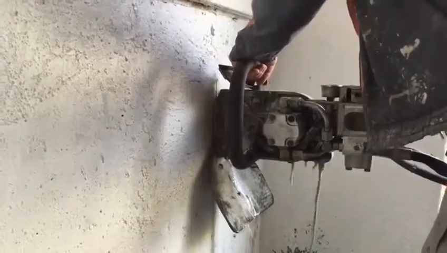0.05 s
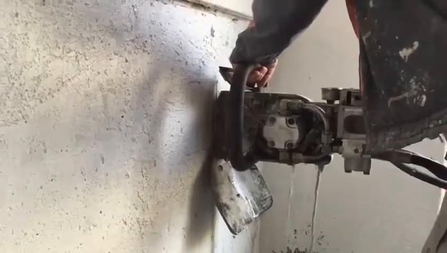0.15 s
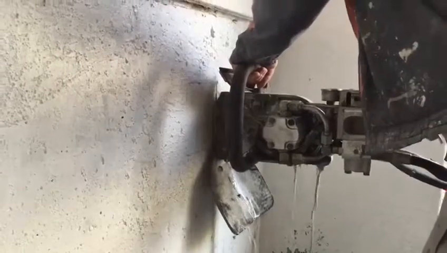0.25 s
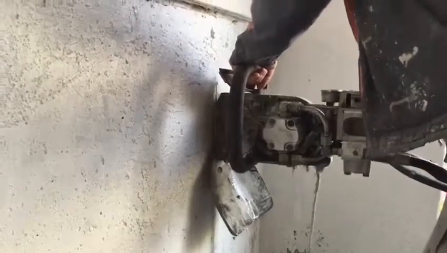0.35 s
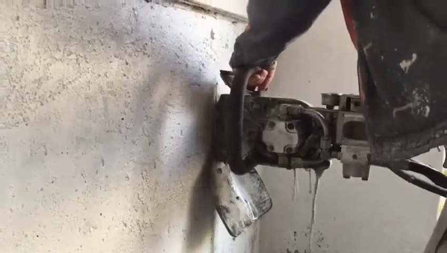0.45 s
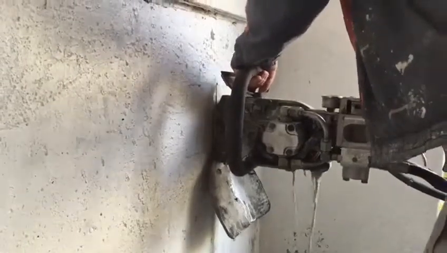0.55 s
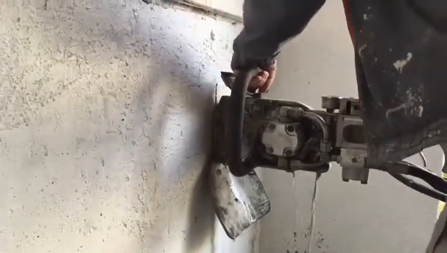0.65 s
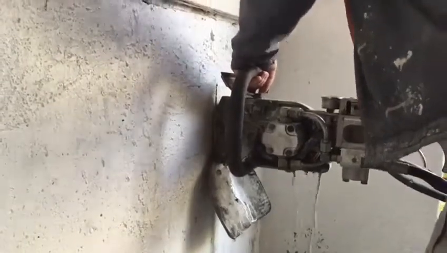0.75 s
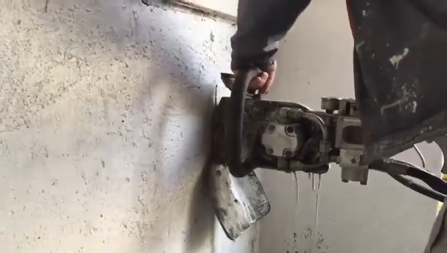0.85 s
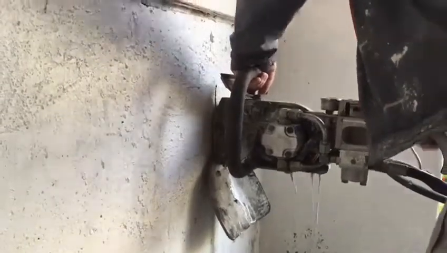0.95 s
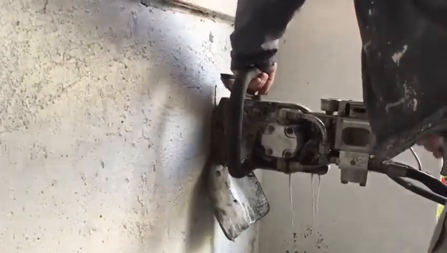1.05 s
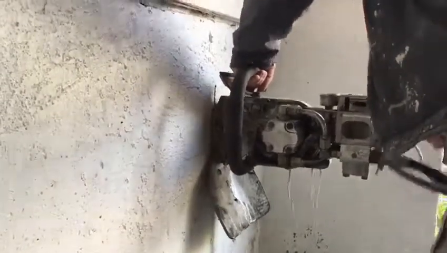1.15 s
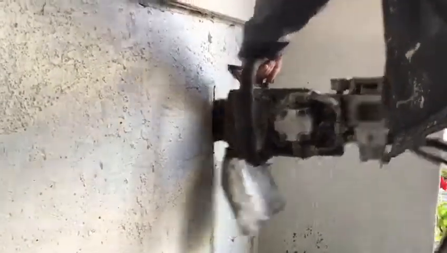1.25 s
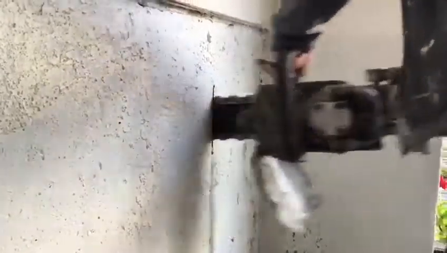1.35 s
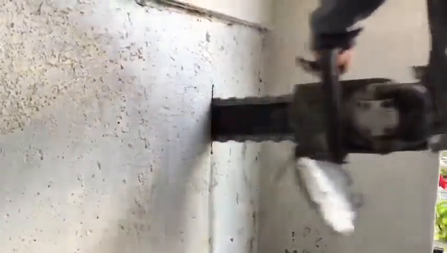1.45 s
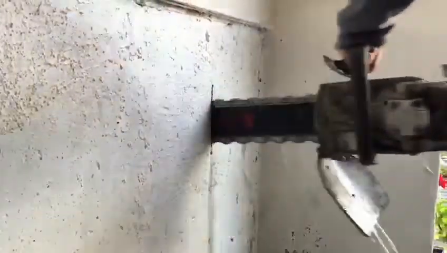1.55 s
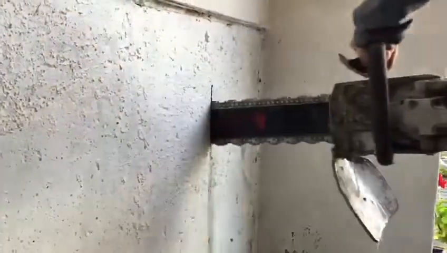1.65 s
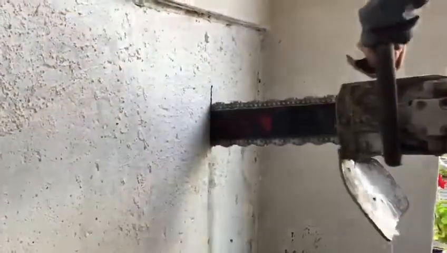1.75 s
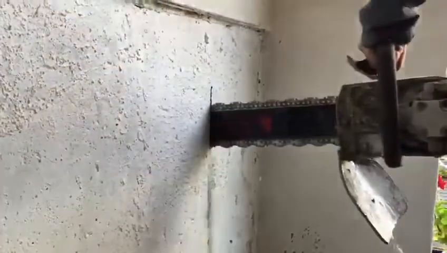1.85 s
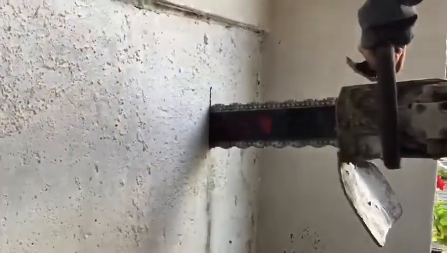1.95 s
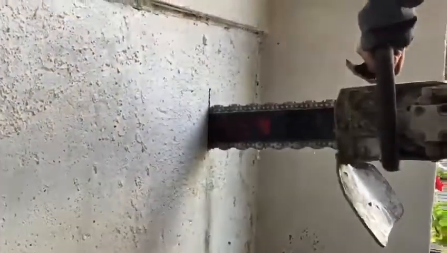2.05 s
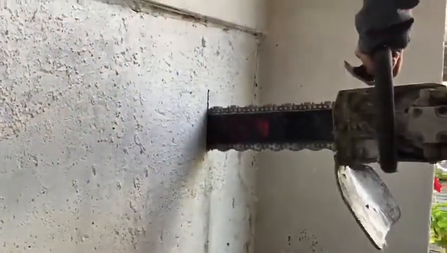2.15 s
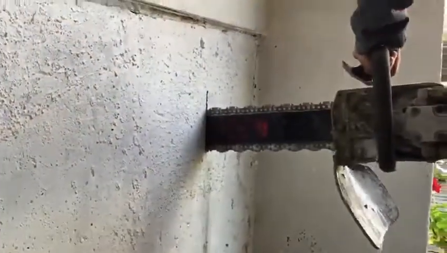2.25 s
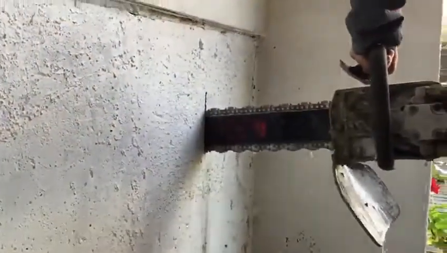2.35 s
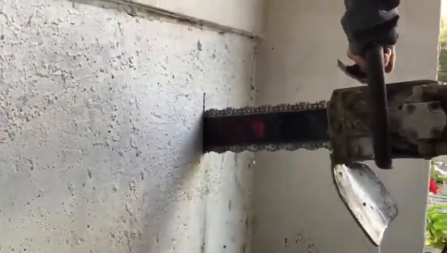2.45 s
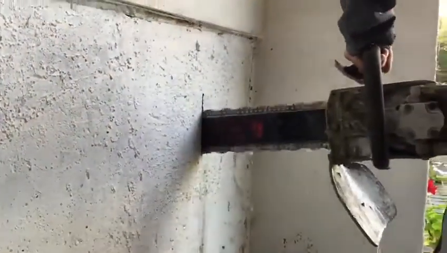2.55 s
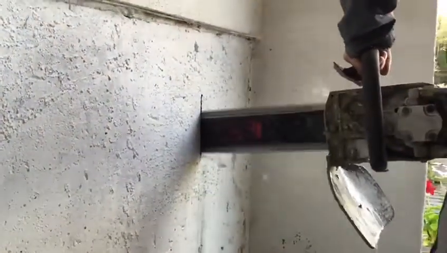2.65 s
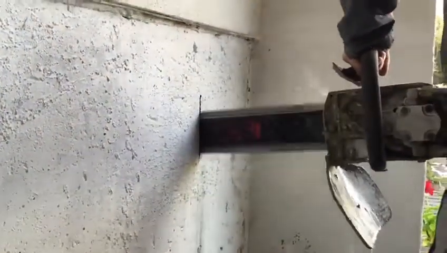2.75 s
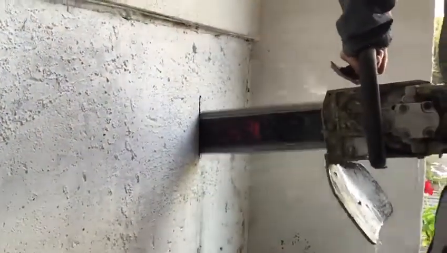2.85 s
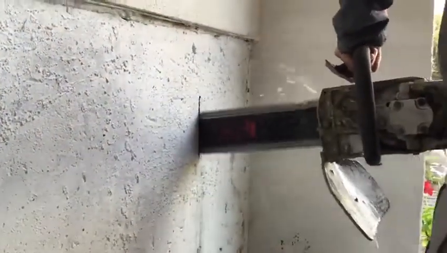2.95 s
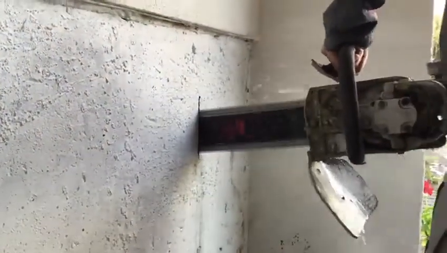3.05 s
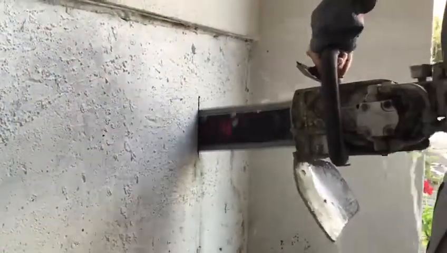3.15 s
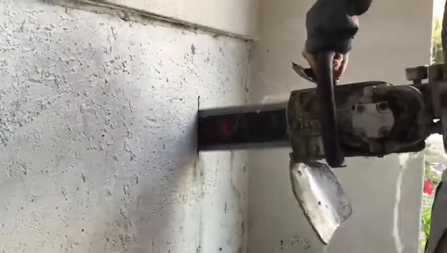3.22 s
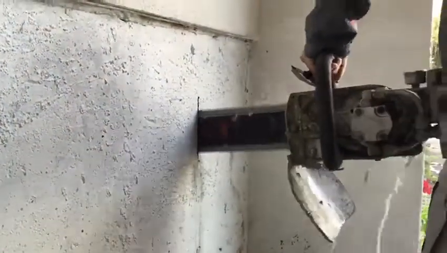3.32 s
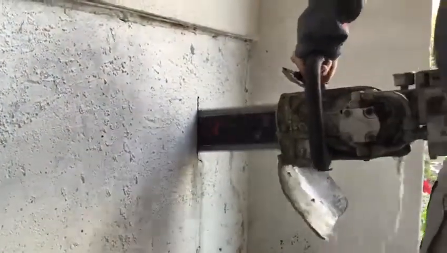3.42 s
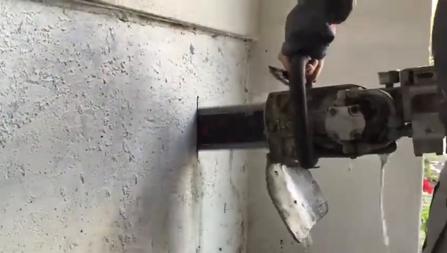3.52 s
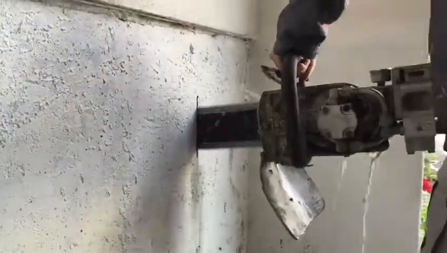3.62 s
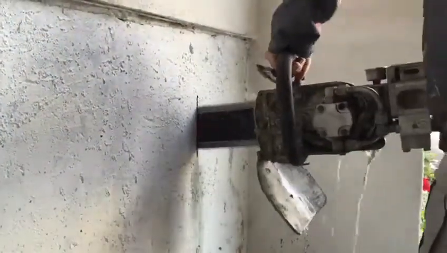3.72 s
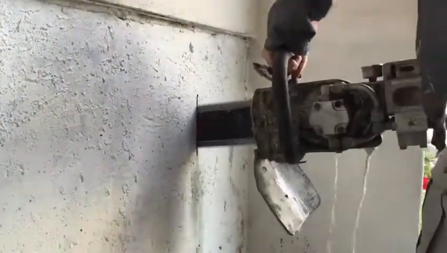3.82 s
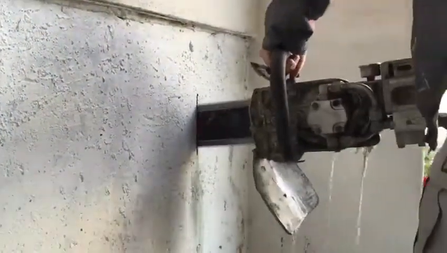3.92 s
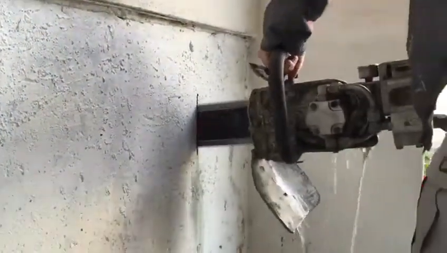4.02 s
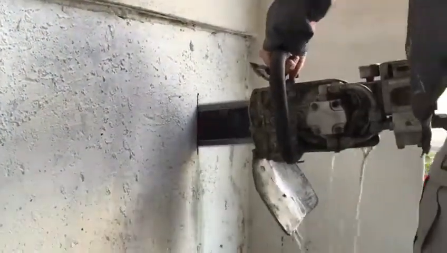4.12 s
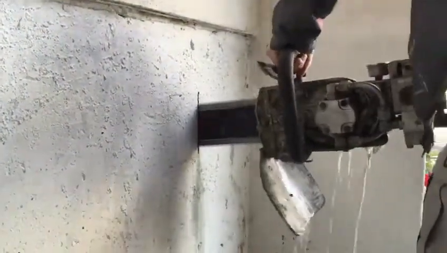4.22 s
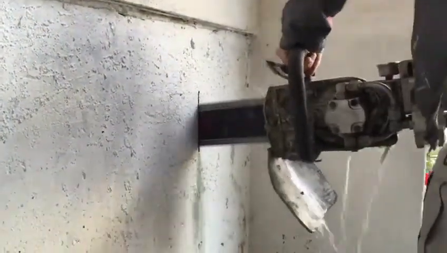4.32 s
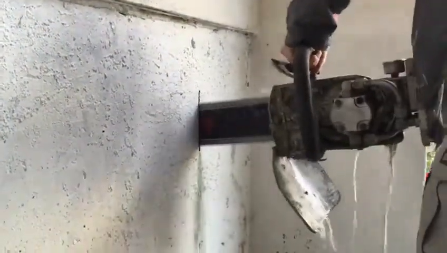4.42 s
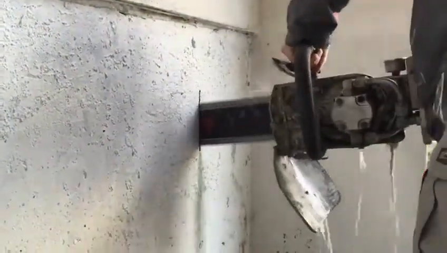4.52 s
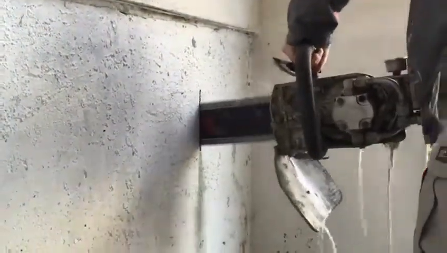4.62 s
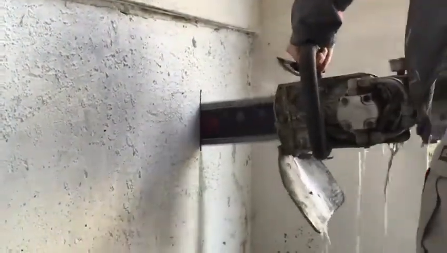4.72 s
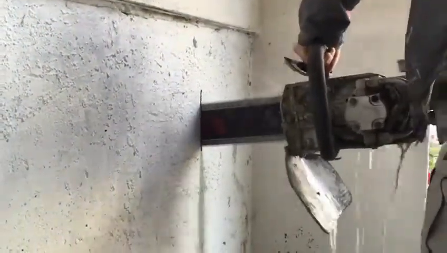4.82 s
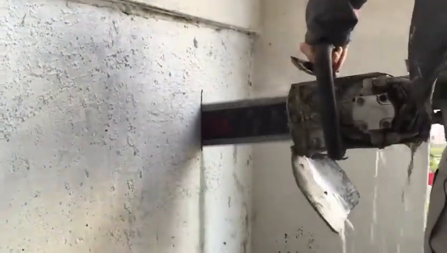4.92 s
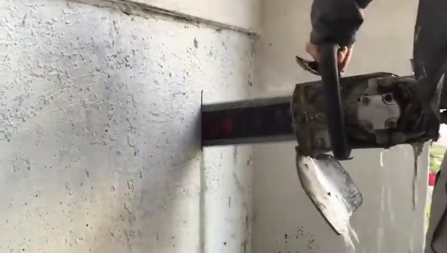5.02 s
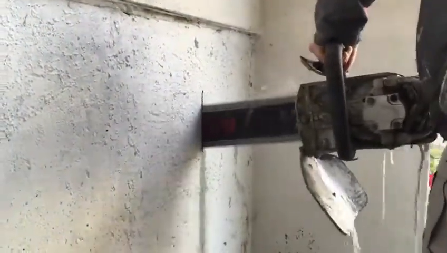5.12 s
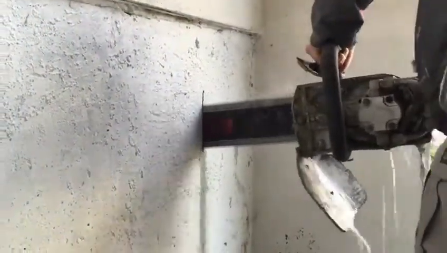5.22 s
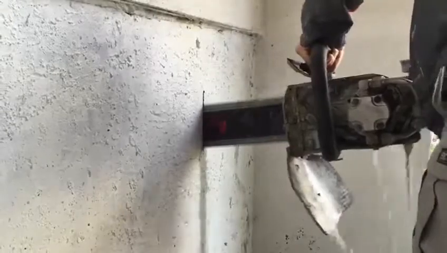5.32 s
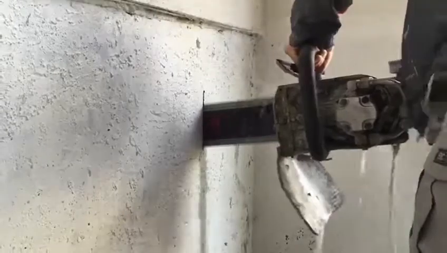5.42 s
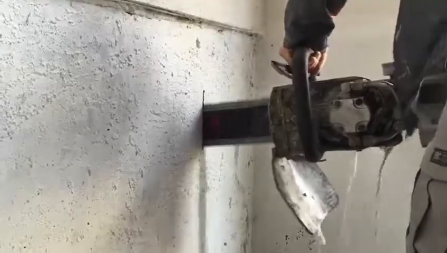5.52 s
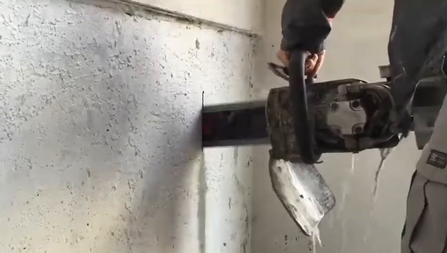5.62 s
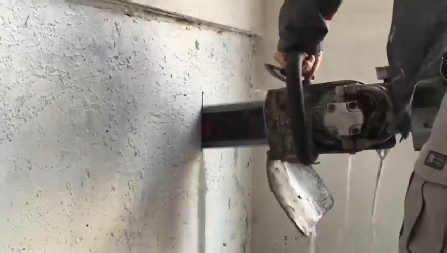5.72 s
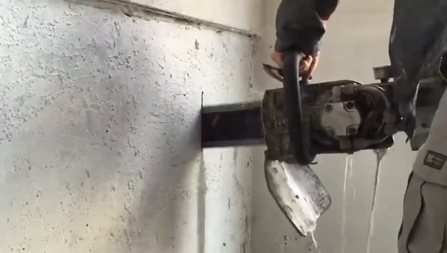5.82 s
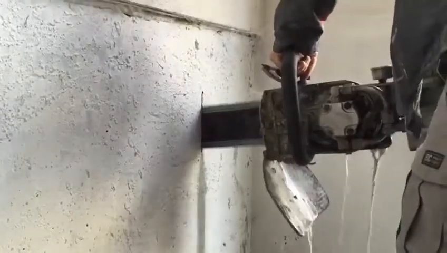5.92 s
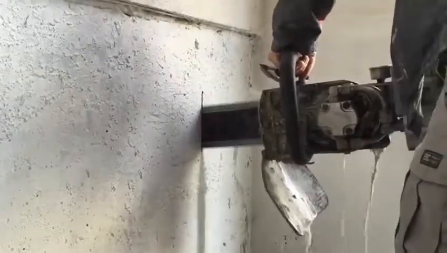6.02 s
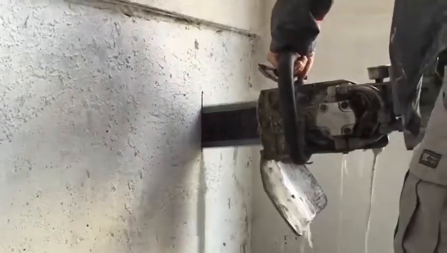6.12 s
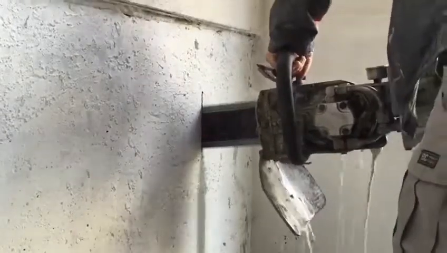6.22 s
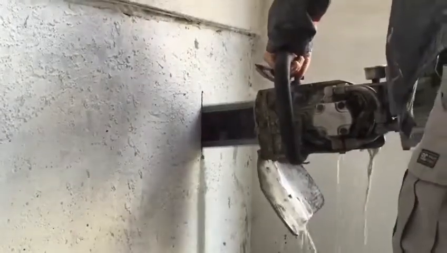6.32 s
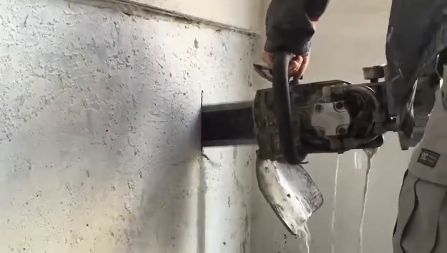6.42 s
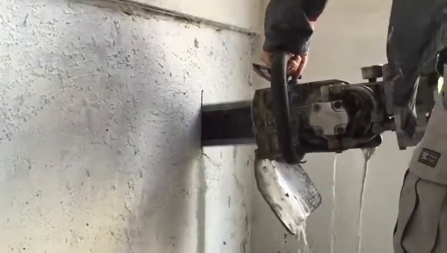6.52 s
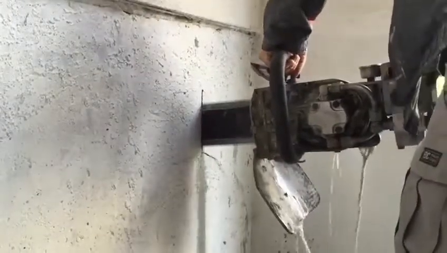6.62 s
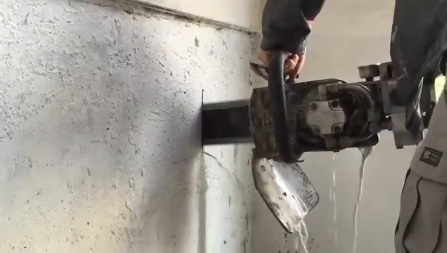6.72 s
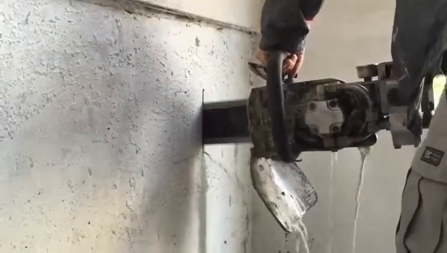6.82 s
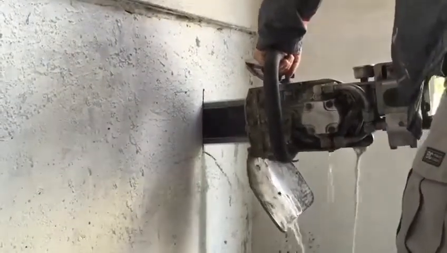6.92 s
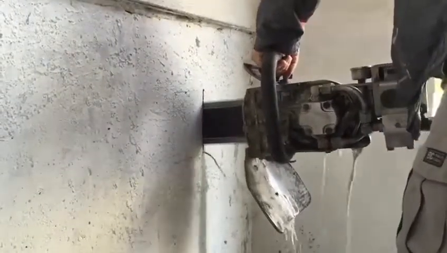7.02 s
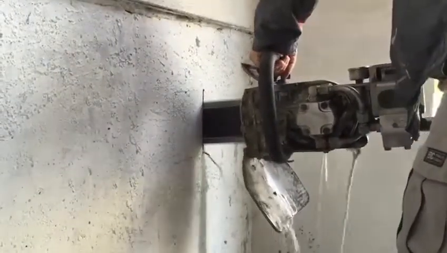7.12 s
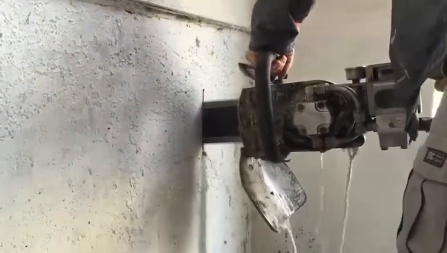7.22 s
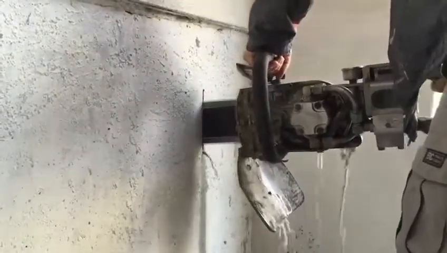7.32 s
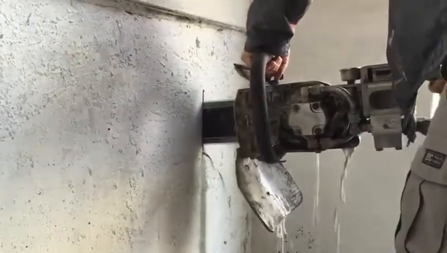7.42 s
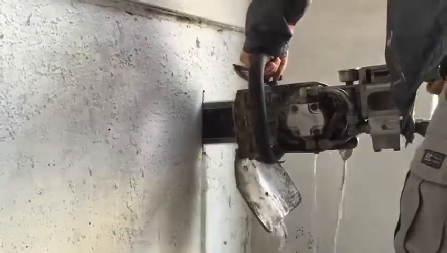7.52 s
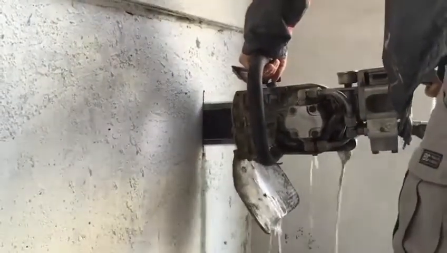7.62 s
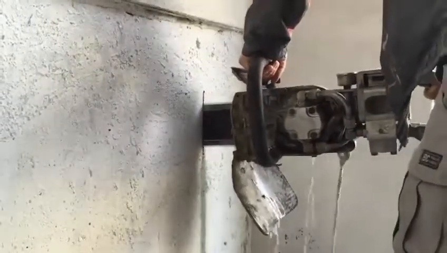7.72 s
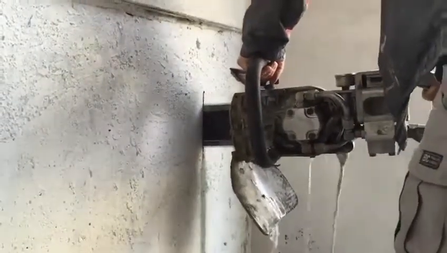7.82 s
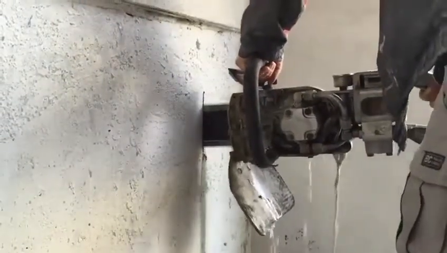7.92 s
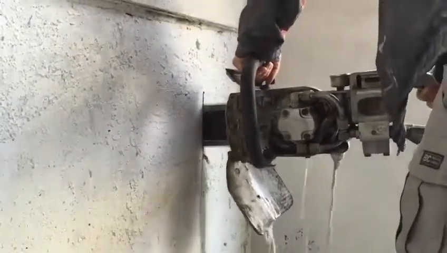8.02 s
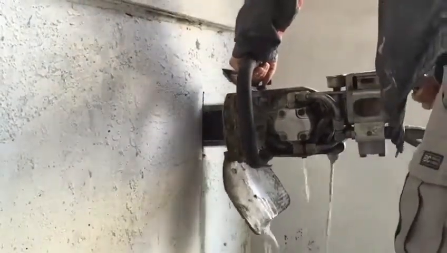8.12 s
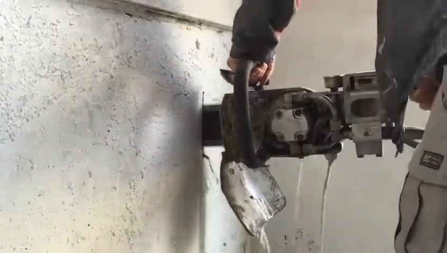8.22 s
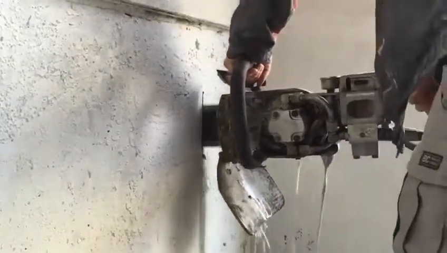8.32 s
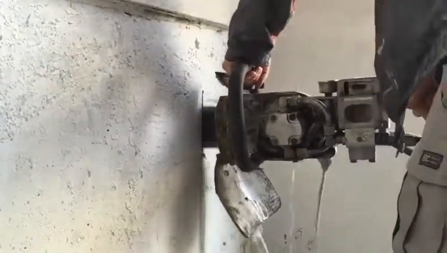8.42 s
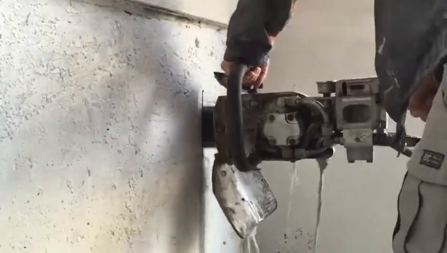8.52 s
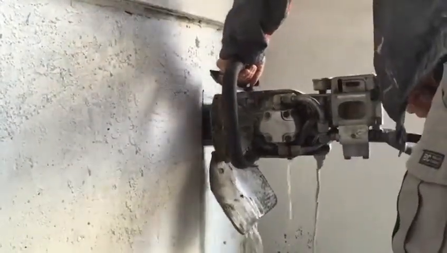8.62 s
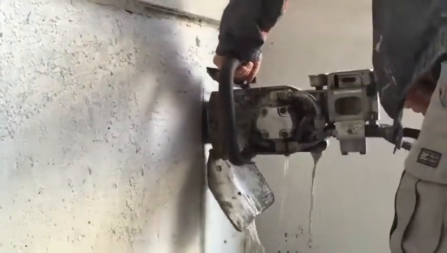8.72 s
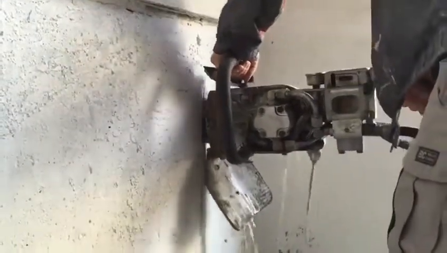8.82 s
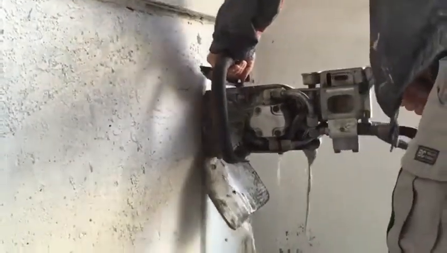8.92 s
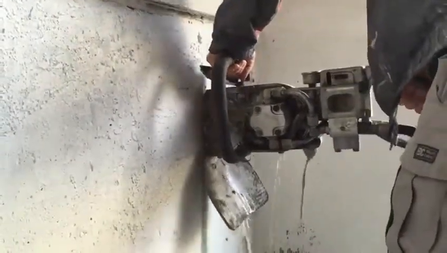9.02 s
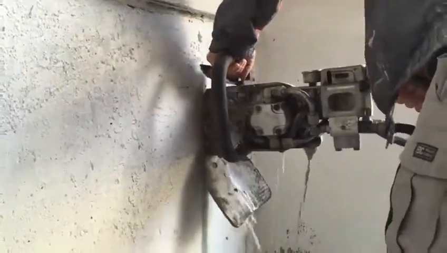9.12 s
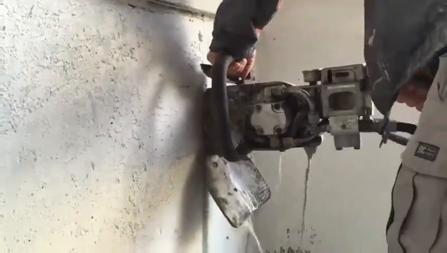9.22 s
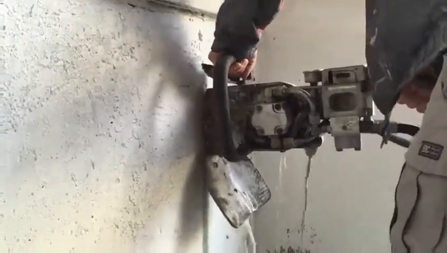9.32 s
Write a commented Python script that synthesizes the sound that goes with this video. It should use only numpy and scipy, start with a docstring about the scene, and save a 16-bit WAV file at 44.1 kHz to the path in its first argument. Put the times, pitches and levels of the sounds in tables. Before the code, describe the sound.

A hydraulic diamond chain saw cuts a concrete wall, heard close in a bare room with a very short, hard echo. From 0 to 0.7 s there is full grinding: bright sandy scraping, coarser crunch and a high, fluctuating sprocket and gear whine. Around 0.6 to 0.75 s a rough squeal slides downward and the chain runs down within about 0.3 s. Until 2.75 s only the power pack's steady throbbing, buzzing hum and fine hissing water remain, rising a little as automatic gain lifts them. At 2.8 to 2.9 s the slack chain slaps the bar in a quick metallic clatter while speed shoots up with a strong whine. Loud grinding then continues to about 9.4 s, its pitch sagging and recovering under load, with squeals surging around 5.4, 7.1 to 7.9 and 8.7 s, coarse rasps near 3.1 and 8.3 s, and faint dull knocks near 4.5, 5.3 and 9.1 s.

```python
"""Chain saw in concrete

A hydraulic diamond chain saw cuts a concrete wall in a bare room, stops for about two seconds and cuts on.
Sprocket and gears whine at multiples of the shaft speed; the segments grind grit from shaped noise,
and noise through narrow resonances makes the guide bar squeal. A power pack hums as a sum of harmonics
and cooling water hisses as filtered droplets. A gain control lifts both while the chain rests."""
import sys
import numpy as np
from scipy import signal
from scipy.fft import rfft, irfft, next_fast_len
from scipy.io import wavfile
from scipy.ndimage import uniform_filter1d, minimum_filter1d, map_coordinates

SR = 44100
rng = np.random.default_rng(int(sys.argv[2]) if len(sys.argv) > 2 else 0)


def generate_wav(signal):
    """Clip the signal to [-1, 1] and save it as 16-bit WAV at the path in sys.argv[1]."""
    frames = np.transpose(np.atleast_2d(signal))
    scaled = np.clip(frames, -1, 1) * 32767
    pcm = np.round(scaled).astype(np.int16)
    wavfile.write(sys.argv[1], SR, pcm)


N = 412758
TIME = np.arange(N) / SR  # seconds

SPROCKET_TEETH, GEAR_TEETH, CHAIN_SEGMENTS = 6, 13, 29
STOP_S, RESTART_S = 0.705, 2.76  # the trigger is let go and pulled again
# How fast sounds fade once the trigger is let go
SCRAPE_FADE_DB_PER_S, CRUNCH_FADE_DB_PER_S, WHINE_FADE_DB_PER_S = 56, 10, 239


def undb(db):
    """Turn decibels into gain."""
    return 10 ** (np.asarray(db) / 20)


def unit(x):
    """Scale a sound to rms 1."""
    return x / np.sqrt(np.mean(x ** 2))


def curves(table):
    """Join the points of a table by straight lines in time, one curve per column."""
    s, *columns = np.transpose(table)
    return [np.interp(TIME, s, column) for column in columns]


def walk(rate):
    """Make a smooth random wander of spread 1, with this many random points per second."""
    knots = rng.standard_normal(8192)
    coarse = map_coordinates(knots, [TIME[::32] * rate], order=3, mode="wrap")
    return unit(coarse).repeat(32)[:N]


def filtered(x, response):
    """Pass a sound through a frequency response given as a function of Hz, then scale to rms 1."""
    size = next_fast_len(N, real=True)
    hz = np.maximum(np.fft.rfftfreq(size, 1 / SR), 1)
    return unit(irfft(rfft(x, size) * response(hz), size)[:N])


def colour(x, points):
    """Shape the spectrum of a sound by (Hz, dB) points; the result has rms 1."""
    f, db = np.transpose(points)
    return filtered(x, lambda hz: undb(np.interp(np.log(hz), np.log(f), db)))


def ring(x, modes):
    """Drive steep resonances with a broadband sound; each reaches about its own level."""
    def response(hz):
        return sum(undb(db) / np.sqrt(w) / (1 + 1j * (hz - f) / w) ** 2 for f, w, db in modes)
    total_rms = np.sqrt(sum(undb(db) ** 2 for _, _, db in modes))
    return filtered(x, response) * total_rms


def grains(spread_db):
    """Make dense tiny clicks of unequal size."""
    extra_db = spread_db * np.minimum(rng.exponential(size=N), 4)
    return rng.standard_normal(N) * undb(extra_db)


COAST_S, COAST_POWER, SPIN_UP_S, SPIN_UP_POWER = .28, 1.7, .185, 1.5


def throttle():
    """Share of full speed: the chain coasts to rest, waits, and spins up again."""
    down = np.clip((TIME - STOP_S) / COAST_S, 0, 1)
    up = np.clip((TIME - RESTART_S) / SPIN_UP_S, 0, 1)
    return (1 - down ** COAST_POWER) + (1 - (1 - up) ** SPIN_UP_POWER)


def coasting():
    """Seconds since the trigger was let go; zero while it is held."""
    return np.maximum(TIME - STOP_S, 0) * (TIME < RESTART_S)


# Shaft speed with the trigger held; it sags as the saw is pushed harder.
# Each row: time in seconds, speed in Hz.
SHAFT_SPEED = [(0, 84.3), (.06, 85.7), (.15, 89.25), (.38, 85.5), (.72, 94.2), (3.05, 97.2), (3.21, 89.54),
               (3.33, 93.66), (3.52, 92.56), (3.63, 88.05), (3.8, 90.2), (4.2, 90.1), (4.32, 93.5),
               (4.44, 86.74), (4.64, 85.34), (4.81, 92.06), (5.07, 90), (5.21, 92.7), (5.36, 90.3),
               (5.59, 90.2), (5.69, 87), (6.03, 88.03), (6.49, 84.17), (6.63, 86.75), (6.78, 85.74),
               (6.94, 87.1), (7.1, 86.14), (7.25, 89.3), (7.8, 91), (7.97, 92.5), (8.1, 90.7), (8.2, 90.4),
               (8.31, 88.05), (8.42, 90.44), (8.49, 89.3), (8.62, 91.35), (8.78, 88.6), (9.09, 91),
               (9.35, 89.2)]


def shaft():
    """The motor shaft: its speed in Hz and the turns it has made, as the load jerks it about."""
    held_hz, = curves(SHAFT_SPEED)
    shaft_hz = held_hz * throttle()
    turns = np.cumsum(shaft_hz * (1 + 0.002037 * walk(35))) / SR
    return shaft_hz, turns


# The bar binds in the slot.
# Each row: start in seconds, length in seconds, then levels in dB for lower squeal, upper squeal
# and link rattle, and extra grit in dB.
BAR_BINDS = [(2.835, 0.32, -38, -33.5, -40.5, -0.1), (3.044, 0.635, -42, -46, -28.5, -1.5),
             (4.454, 0.23, -35.5, -41, -29.5, 1), (5.39, 0.22, -34, -33.5, -26.5, 1.5),
             (5.561, 0.63, -35, -39, -34, -4.5), (6.15, 0.98, -43, -40, -32, 2.5),
             (7.103, 0.769, -35.5, -31.5, -35, -2.3), (8.233, 0.27, -37.5, -33.5, -35.5, 0.5),
             (8.694, 0.17, -31.5, -27, -30.5, 1), (8.862, 0.26, -37, -44, -30.5, 0.5)]
BIND_ATTACK_S, BIND_RELEASE_S = 0.051, 0.034
FREE_LOWER_DB, FREE_UPPER_DB, FREE_RATTLE_DB = -52.5, -45, -39.5  # with the bar running free


def binding():
    """Gains of lower squeal, upper squeal, link rattle and grit: each bind swells, holds and lets go."""
    free = undb([FREE_LOWER_DB, FREE_UPPER_DB, FREE_RATTLE_DB, 0])[:, None]
    extra = np.zeros((4, N))
    for s, length, *levels in BAR_BINDS:
        swell = (TIME - s) / BIND_ATTACK_S
        release = 1 - (TIME - s - length) / BIND_RELEASE_S
        grip = np.clip(np.minimum(swell, release), 0, 1)
        extra = np.maximum(extra, grip * (undb(levels)[:, None] - free))
    return free + extra


# The saw body lifts or weakens a harmonic that crosses one of its resonances.
# Each row: pitch in Hz, width in Hz, lift in dB.
BODY_RESONANCES = [(3000, 92, -4.5), (3130, 50, 4.5), (3230, 46, 3.5), (3380, 90, 4)]


def body(hz):
    """Gain of the saw body for a tone of moving pitch."""
    lift_db = sum(db / (1 + (2 * (hz[::32] - f) / w) ** 2) for f, w, db in BODY_RESONANCES)
    return undb(lift_db).repeat(32)[:N]


WOBBLE = .2  # share of the level that swings once a turn


def partial(turns, multiple, flutter, patchy_db):
    """One shaft harmonic; uneven tooth contacts shake its size and phase, and it wobbles once a turn."""
    unrest = np.sqrt(max(multiple, 16) / 24)  # high harmonics are shaken more
    slow_shake = walk(45) + 1j * walk(45)
    fast_shake = walk(170) + 1j * walk(170)
    shake = 1 + flutter * unrest * (slow_shake + .5 * fast_shake)
    wobble = 1 + WOBBLE * np.cos(2 * np.pi * turns + walk(10))
    patches = undb(patchy_db * unrest * walk(12))
    carrier = np.exp(2j * np.pi * (multiple * turns + rng.random()))
    return unit(wobble * patches * np.real(shake * carrier))


def body_tone(turns, shaft_hz, multiple, flutter, patchy_db):
    """One shaft harmonic as the saw body passes it on."""
    return body(multiple * shaft_hz) * partial(turns, multiple, flutter, patchy_db)


# Faint sprocket tones. Each row: harmonic of the sprocket's tooth rate, relative level in dB.
FAINT_SPROCKET = [(6, -4), (7, -7)]
# Faint gear tones. Each row: harmonic of the gears' tooth rate, relative level in dB.
FAINT_GEARS = [(1, -6.5), (3, -6)]
# More faint tones at multiples of the shaft speed, most between the tooth harmonics.
# Each row: multiple of the shaft speed, relative level in dB.
FAINT_SHAFT_TONES = [(8, -15), (11, -9), (20, -11.5), (22, -9), (25, -7.5), (41, -7), (54, -6)]
# Shared level of all these faint tones. Each row: time in seconds, level in dB.
FAINT_LEVEL = [(0, -31), (.15, -33), (.5, -32), (.7, -34.5), (3.0, -37.5), (3.8, -29.5), (4.4, -34.5),
               (5.3, -32), (6.0, -34.5), (7.3, -31.5), (8.0, -36), (8.3, -34), (8.85, -32.5), (9.1, -38),
               (9.25, -42)]
FADES_PER_S, FADE_DB = 5, 2


def faint_whine(turns, shaft_hz):
    """Weak multiples of the shaft speed, each drifting through the room's standing waves on its own."""
    level_db, = curves(FAINT_LEVEL)
    tones = [(SPROCKET_TEETH * k, db) for k, db in FAINT_SPROCKET]
    tones += [(GEAR_TEETH * k, db) for k, db in FAINT_GEARS]
    tones += [(k, db) for k, db in FAINT_SHAFT_TONES]
    whine = 0
    for multiple, db in tones:
        gain = undb(level_db + db + FADE_DB * walk(FADES_PER_S))
        whine = whine + gain * body_tone(turns, shaft_hz, round(multiple), flutter=.36, patchy_db=2.5)
    return whine


# The chain cover's ringing level, for its noise and its tone. Each row: time in seconds, level in dB.
COVER_LEVEL = [(0, -33), (.15, -28), (.4, -32), (.7, -27.5), (3.0, -52), (3.35, -31.5), (4.0, -31.5),
               (4.6, -38), (5.1, -43), (5.22, -31), (5.4, -40), (8.6, -38), (8.8, -30.5), (8.92, -33),
               (9.15, -38), (9.28, -29.5)]
# The strong sprocket harmonics, by number. In all four, each row: time in seconds, level in dB.
SPROCKET_1 = [(0.201, -46), (0.349, -38.5), (3.0, -39.5), (3.4, -39.5), (4.2, -42.5), (4.6, -34.5),
              (5.0, -46.5), (5.6, -35.5), (6.2, -43), (6.4, -35.5), (7.4, -39.5), (8.8, -35.5),
              (9.2, -45.5)]
SPROCKET_3 = [(0, -39), (.15, -34), (.7, -41), (3.0, -44), (3.2, -30), (3.35, -48), (4.3, -46), (4.6, -36),
              (4.8, -44), (4.95, -31), (5.5, -34), (5.8, -37), (6.45, -31.5), (7.1, -33), (7.6, -40.5),
              (8.15, -39), (8.3, -33), (8.6, -40), (8.85, -29.5), (9.35, -41)]
SPROCKET_4 = [(0, -41), (.15, -23.5), (.37, -43), (.52, -29), (.7, -28.5), (2.89, -41), (2.95, -17),
              (3.03, -21.5), (3.12, -25.5), (3.25, -26.5), (3.38, -48), (3.65, -29), (4.3, -28),
              (4.43, -21.5), (4.65, -31), (5.4, -35), (5.7, -34), (6.2, -25.5), (6.35, -36), (7.08, -39),
              (7.22, -25.5), (7.6, -28), (7.959, -38), (8.3, -25.5), (8.6, -29), (8.8, -24), (9.14, -23.5),
              (9.201, -36)]
SPROCKET_5 = [(0, -29), (.2, -32), (.35, -28), (.55, -33), (.7, -41), (3.0, -44), (3.3, -36), (3.6, -39),
              (4.3, -42), (5.58, -31.5), (5.8, -43), (6.18, -46), (6.28, -31), (6.48, -27), (6.65, -48),
              (7.0, -39), (7.4, -39), (7.8, -46), (8.3, -31), (8.8, -30.5), (9.2, -40)]
# The gears' 2nd harmonic, which beats against the sprocket's 4th.
# Each row: time in seconds, level in dB.
GEAR_2 = [(0, -29), (.16, -25), (.38, -33.5), (.6, -20.5), (.72, -28), (2.9, -40), (3.2, -29), (3.4, -47),
          (3.65, -31), (4.05, -33), (4.45, -28.5), (4.72, -26), (4.84, -48), (5.02, -28), (5.23, -42),
          (5.6, -27), (6.0, -27), (6.2, -28.5), (6.7, -26.5), (7.15, -28), (7.4, -44), (7.6, -31.5),
          (8.05, -31.5), (8.35, -47), (8.75, -33), (9.35, -30.5)]
COVER_TONE_DB = -2  # relative to the cover's level


def strong_whine(turns, shaft_hz):
    """Links land on sprocket teeth; gear teeth pulse the oil and make the chain cover sing."""
    sprocket = [(1, SPROCKET_1), (3, SPROCKET_3), (4, SPROCKET_4), (5, SPROCKET_5)]
    tones = [(SPROCKET_TEETH * k, curves(table)[0]) for k, table in sprocket]
    tones.append((2 * GEAR_TEETH, curves(GEAR_2)[0]))
    tones.append((4 * GEAR_TEETH, curves(COVER_LEVEL)[0] + COVER_TONE_DB))
    return sum(undb(db) * body_tone(turns, shaft_hz, multiple, flutter=.22, patchy_db=1.53)
               for multiple, db in tones)


SLACK_S = .19


def slack():
    """The chain whips loose at the restart and draws tight again."""
    return np.sin(np.pi * np.clip((TIME - RESTART_S) / SLACK_S, 0, 1))


# Tones of the slack chain rattling on the sprocket.
# Each row: multiple of the shaft speed, relative level in dB.
LOOSE_TONES = [(11, -6), (12, 0), (13, -8), (18, -3), (30, -3), (36, -3)]
LOOSE_LINKS_DB, COAST_LINKS_DB = -28, -41  # speeding up, running down


def loose_links(turns, scrape_fade):
    """The slack chain rattles on the sprocket as it runs down and speeds up."""
    running_down = undb(COAST_LINKS_DB) * scrape_fade * (coasting() > 0)
    looseness = undb(LOOSE_LINKS_DB) * slack() + running_down
    return looseness * sum(undb(db) * partial(turns, round(k), flutter=0.48, patchy_db=6.5)
                           for k, db in LOOSE_TONES)


RUNNING_HZ = 60  # shaft speed from which the drive sounds at full strength


def drive(turns, shaft_hz, rattle_gain):
    """Links and gears whine while the chain is driven taut, and rattle as it binds or hangs loose."""
    scrape_fade = undb(-SCRAPE_FADE_DB_PER_S * coasting())
    taut = throttle() ** 2 * undb(-WHINE_FADE_DB_PER_S * coasting())
    whine = taut * (faint_whine(turns, shaft_hz) + strong_whine(turns, shaft_hz))
    rattle_tone = body_tone(turns, shaft_hz, 2 * SPROCKET_TEETH, flutter=0.46, patchy_db=2.5)
    rattle = rattle_gain * scrape_fade * rattle_tone
    speed_gain = np.minimum(shaft_hz / RUNNING_HZ, 1)
    return speed_gain * (rattle + whine + loose_links(turns, scrape_fade))


RIPPLE_DB, RIPPLE_FULL_HZ, RIPPLE_SPACING_HZ, RIPPLE_CHANGES_PER_S = 6.2, 4300, 44, 4  # at full speed


def uneven_treble(x):
    """Random ripple makes the treble uneven; it moves with the chain speed."""
    hz, s, spectrum = signal.stft(x, SR, nperseg=2048)
    travel = np.interp(s, TIME, np.cumsum(throttle()) / SR)
    place = np.meshgrid(hz / RIPPLE_SPACING_HZ, travel * RIPPLE_CHANGES_PER_S, indexing="ij")
    bumps = map_coordinates(rng.standard_normal((512, 64)), place, order=3, mode="wrap")
    depth = np.minimum(hz / RIPPLE_FULL_HZ, 1)[:, None] ** 2
    ripple = undb(RIPPLE_DB * depth * np.minimum(bumps, 1))
    return unit(signal.istft(spectrum * ripple, SR)[1][:N])


def grit(turns, grain_db, bite_db, pulse):
    """Grains break off as each diamond segment passes; its own bite returns with every lap of the chain."""
    passes = SPROCKET_TEETH * turns
    segment = passes.astype(int) % CHAIN_SEGMENTS
    bite = rng.standard_normal(CHAIN_SEGMENTS)[segment]
    return grains(grain_db) * undb(bite_db * bite) * (1 + pulse * np.cos(2 * np.pi * passes))


# How hard the saw is fed.
# Each row: time in seconds, fine scraping in relative dB, coarse crunch in relative dB.
FEED_LEVELS = [(0, 1, -0.5), (.7, 0.5, -3), (2.8, 5, 3), (3.3, 4.5, 2.5), (3.9, 2, 1.5), (4.3, 2, 3),
               (4.9, 1.5, 1), (5.4, 1.5, 3), (6.5, -1.7, -1.5), (7.5, 2.1, 0.5), (8.1, 1.6, -2),
               (9.35, -2, 0)]
# Tone colour of the fine scraping. Each row: pitch in Hz, relative level in dB.
SCRAPE_COLOUR = [(900, -20), (1800, -1.5), (2280, 7.5), (2480, -8.5), (2700, 5.5), (2860, 2), (3100, 5),
                 (3650, 2.5), (4200, 6), (4700, 2.5), (5100, 5.5), (5400, 1.5), (5800, 3.5), (6050, -1.5),
                 (6700, 3), (7350, -3.5), (7950, 3.5), (8400, 0.5), (8900, 1.5), (9600, -62)]
# Tone colour of the coarse crunch. Each row: pitch in Hz, relative level in dB.
CRUNCH_COLOUR = [(100, -28.5), (250, -18.5), (330, -12.5), (450, -3), (720, -8.5), (980, 3.5), (1120, -4),
                 (1300, 1), (1600, 4.5), (1950, 0.5), (2600, 2), (5000, -49)]


def scrape_and_crunch(turns):
    """Small even grains scrape in the treble; larger uneven ones crunch lower down."""
    scrape_db, crunch_db = curves(FEED_LEVELS)
    scrape_db = scrape_db - 25.5 - SCRAPE_FADE_DB_PER_S * coasting()
    crunch_db = crunch_db - 29.0 - CRUNCH_FADE_DB_PER_S * coasting() + 1.0 * walk(20)
    fine = uneven_treble(grit(turns, grain_db=0.5, bite_db=0.3, pulse=0.33))
    coarse = grit(turns, grain_db=1.5, bite_db=1.5, pulse=0.14)
    return colour(fine, SCRAPE_COLOUR) * undb(scrape_db) + colour(coarse, CRUNCH_COLOUR) * undb(crunch_db)


SQUEAL_SWAY = .004  # typical share by which the pitch bends


def sway(x):
    """Changing pressure on the bar bends the pitch of its squeal."""
    return map_coordinates(x, [np.cumsum(1 + SQUEAL_SWAY * walk(3))], order=3, mode="mirror")


# Guide bar resonances, lower and upper group.
# In both, each row: pitch in Hz, width in Hz, relative level in dB.
LOWER_BAR_MODES = [(6340, 55, 3.5), (3730, 130, 3), (3976, 130, -1), (4590, 150, -0.5)]
UPPER_BAR_MODES = [(8050, 43, -3.5), (8408, 57, 3)]


def squeal(lower_gain, upper_gain):
    """The bar rings in the slot at its own pitches, driven by grains."""
    lower = sway(ring(grains(1.8), LOWER_BAR_MODES)) * lower_gain
    upper = sway(ring(grains(0.99), UPPER_BAR_MODES)) * upper_gain
    return lower + upper


# Resonances of the chain cover. Each row: pitch in Hz, width in Hz, relative level in dB.
COVER_RESONANCES = [(3200, 320, -2), (4680, 69, -1), (4820, 130, -2)]


def cover():
    """The grinding shakes the chain cover, whose ringing dies quickly once the trigger is let go."""
    cover_db, = curves(COVER_LEVEL)
    level_db = cover_db - WHINE_FADE_DB_PER_S * coasting() + 0.69 * walk(22)
    return ring(grains(3.1), COVER_RESONANCES) * undb(level_db)


BITE_HZ = 45.7  # shaft speed from which the chain scrapes at full strength


def cutting(turns, shaft_hz, lower_gain, upper_gain, grit_gain):
    """The chain scrapes and crunches the wall while bar and cover ring with it."""
    chatter = undb(0.7 * walk(90))  # hard pebbles jolt the whole chain
    ringing = throttle() * (squeal(lower_gain, upper_gain) + cover())
    speed_gain = np.minimum(shaft_hz / BITE_HZ, 1)
    return speed_gain * chatter * (grit_gain * scrape_and_crunch(turns) + ringing)


# Harmonics of the oil pump. Each row: harmonic of the pump's turning rate, typical rms level in dB.
PUMP_HARMONICS = [(1, -73), (2, -64), (3, -66), (5, -66), (7, -52.5), (12, -51.5), (13, -59.5), (22, -61),
                  (23, -46), (24, -50), (25, -48.5), (35, -64.5), (37, -55), (48, -64.5), (49, -60.5),
                  (72, -60.5), (82, -60.5), (96, -60)]
PUMP_HZ, MAINS_HUM_HZ = 47.92, 100


def power_pack():
    """A motor turns the oil pump; its harmonics form one throb a turn and beat against the mains hum."""
    turns = PUMP_HZ * (TIME + np.cumsum(0.00013 * walk(5)) / SR)
    smear = .3  # radians; the hoses delay high harmonics more and soften the throb
    pump = 0
    for k, db in PUMP_HARMONICS:
        phase = 2 * np.pi * round(k) * turns - smear * round(k) ** 2
        pump = pump + undb(db + 1.1 * walk(11)) * np.cos(phase)
    hum = undb(-85.5) * np.sin(2 * np.pi * MAINS_HUM_HZ * TIME)
    return np.sqrt(2) * (pump + hum)  # root 2 turns rms levels into peaks


# Tone colour of the water spray and the room's murmur. Each row: pitch in Hz, relative level in dB.
WATER_COLOUR = [(25, -30), (50, -10), (90, 2), (130, 0.5), (250, 5), (520, 3), (690, 7.5), (1100, 5),
                (1350, 2.5), (1850, 7.5), (2150, -0.5), (2900, 2.5), (3250, -3), (3700, 1.5), (4300, -5.5),
                (4600, -3), (5000, -11.5), (5600, 0), (7400, -9.5), (8000, -1), (8600, 2.5), (9600, -29)]
# The bar's ringing under the spray. Each row: pitch in Hz, width in Hz, relative level in dB.
SPRAYED_BAR_MODES = [(1493, 31, -4), (5320, 55, 4), (6070, 73, 3.5), (6270, 94, -1), (7010, 73, 2.5)]
# Each row: time in seconds, spray level in dB.
SPRAY_LEVEL = [(0, -34.5), (1.0, -39), (1.6, -42), (2.75, -44.5), (9.36, -44.5)]


def water():
    """Cooling water sprays from the bar in fine droplets and rings it."""
    spray_db, = curves(SPRAY_LEVEL)
    drops = uneven_treble(grains(4.4))
    hiss = colour(drops, WATER_COLOUR) * undb(1.1 * walk(15))
    ringing = undb(-17.0) * ring(grains(3.5), SPRAYED_BAR_MODES)
    return undb(spray_db) * (hiss + ringing)


SKID_S, SKID_LENGTH_S, SKID_FROM_HZ, SKID_TO_HZ, SKID_DB = .615, .14, 1360, 830, -33


def skid():
    """A rough squeal slides down as the bar starts to leave the cut."""
    along = np.clip((TIME - SKID_S) / SKID_LENGTH_S, 0, 1)
    turns = np.cumsum(SKID_FROM_HZ + (SKID_TO_HZ - SKID_FROM_HZ) * along) / SR
    roughness = 1 + walk(260) + 1j * walk(260)
    rasp = np.real(roughness * np.exp(2j * np.pi * turns))
    swell = np.sqrt(4 * along * (1 - along))
    return undb(SKID_DB) * swell * unit(rasp)


def blows(table, attack_s):
    """Force of sudden blows given as (seconds, dB, decay time): a quick rise, then an even fall in dB."""
    force = 0
    for s, db, t60 in table:
        rise = np.clip((TIME - s) / attack_s, 0, 1)
        force = force + undb(db - 60 * np.abs(TIME - s) / t60) * rise
    return force


# Resonances of the slapped bar. Each row: pitch in Hz, width in Hz, relative level in dB.
SLAPPED_BAR_MODES = [(424, 40, -16), (1458, 130, -5), (2373, 52, -1.5), (3058, 80, -3.5), (5530, 2500, -7)]
# The slack chain's blows. Each row: start in seconds, level in dB.
SLAP_BLOWS = [(2.791, -27), (2.806, -24), (2.831, -23), (2.874, -17), (2.903, -24)]
SLAP_T60_S = 0.096  # time to fall by 60 dB


def slaps():
    """The slack chain hits the bar several times as it is yanked up to speed."""
    force = blows([(s, db, SLAP_T60_S) for s, db in SLAP_BLOWS], attack_s=0.0015)
    return force * ring(rng.standard_normal(N), SLAPPED_BAR_MODES)


# The chain catches on a pebble. Each row: start in seconds, length in seconds, level in dB.
PEBBLE_CATCHES = [(3.13, 0.13, -26), (8.237, 0.095, -25.5), (8.39, 0.12, -31), (9.085, 0.064, -34)]
# Resonances of the rasp. Each row: pitch in Hz, width in Hz, relative level in dB.
RASP_MODES = [(1020, 120, -11), (1220, 140, -7.5), (1476, 70, -3)]


def gnaws():
    """The segments catch on hard pebbles: short coarse rasps."""
    force = 0
    for s, length, db in PEBBLE_CATCHES:
        arch = np.clip(1 - np.abs(2 * (TIME - s) / length - 1), 0, 1)
        force = force + undb(db) * np.sqrt(arch)
    return force * undb(3.9 * walk(90)) * ring(grains(3.6), RASP_MODES)


# The saw body knocks against the wall.
# Each row: start in seconds, level in dB, time to fall by 60 dB in seconds.
WALL_KNOCKS = [(4.5, -43.5, 0.94), (5.261, -47, 0.87), (9.111, -38, 0.27)]
# Resonances of the housing. Each row: pitch in Hz, width in Hz, relative level in dB.
HOUSING_MODES = [(197, 36, -8.5), (235, 120, -1.5), (1210, 120, 8)]


def knocks():
    """Blows against the wall make the housing judder dully."""
    return blows(WALL_KNOCKS, attack_s=0.0094) * ring(rng.standard_normal(N), HOUSING_MODES)


def room(x, t60, wet_db):
    """Bare concrete walls add a dense tail that falls by 60 dB in t60 seconds."""
    t = TIME[:SR // 2]
    tail = rng.standard_normal(len(t)) * undb(-60 * t / t60) * (t > .004)
    tail = tail / np.sqrt(np.sum(tail ** 2))
    return x + undb(wet_db) * signal.fftconvolve(x, tail)[:N]


def scene():
    """The saw in its room, with its power pack and water."""
    shaft_hz, turns = shaft()
    lower, upper, rattle, grit_gain = binding()
    saw = drive(turns, shaft_hz, rattle) + cutting(turns, shaft_hz, lower, upper, grit_gain)
    saw = saw + skid() + slaps() + gnaws() + knocks()
    return (room(saw, t60=0.047, wet_db=-13.0) + power_pack() + water())[None]


def auto_gain(x, target_db, most_db, rise_db_per_s, fall_db_per_s):
    """After a short hold quiet sound is lifted, and the lift is taken back when it gets loud."""
    hop, hold = SR // 200, 40  # samples per step, steps
    level_db = 10 * np.log10(uniform_filter1d(x ** 2, size=2048)[::hop] + 1e-12)
    room_left_db = minimum_filter1d(target_db - level_db, size=hold, origin=hold // 2 - 1)
    most_fall, most_rise = fall_db_per_s * hop / SR, rise_db_per_s * hop / SR
    lift_db = [0]
    for wanted in np.clip(room_left_db, 0, most_db):
        lift_db.append(lift_db[-1] + np.clip(wanted - lift_db[-1], -most_fall, most_rise))
    return x * undb(np.interp(TIME, TIME[::hop], lift_db[1:]))


TOP_HZ = 9350  # the treble is cut above this


def record(dry):
    """Ride the gain, round the loudest peaks and cut the top."""
    sound = auto_gain(dry[0], target_db=-26.5, most_db=11, rise_db_per_s=25, fall_db_per_s=44)
    sound = np.tanh(sound)
    low_pass = signal.ellip(10, .2, 80, TOP_HZ, fs=SR, output="sos")
    return signal.sosfilt(low_pass, sound)[None]


dry = scene()
out = record(dry)
generate_wav(out)
```